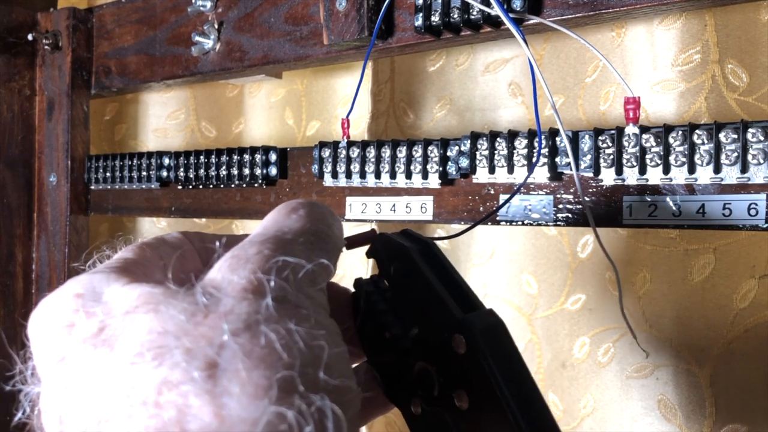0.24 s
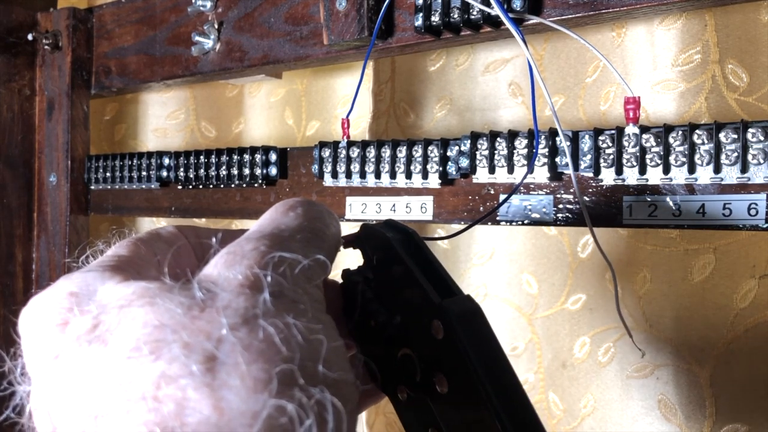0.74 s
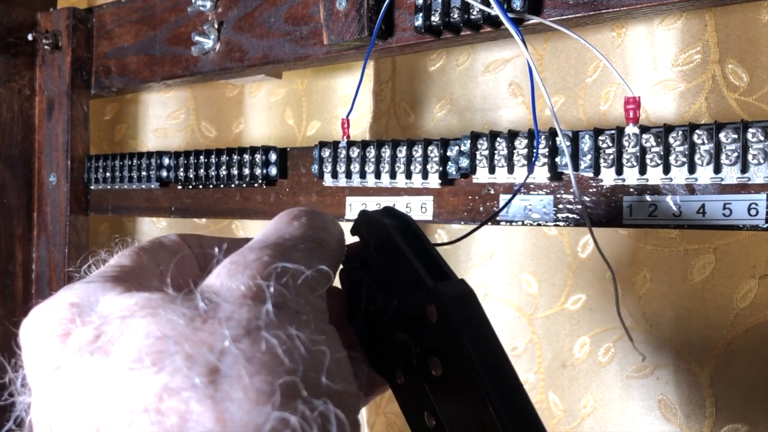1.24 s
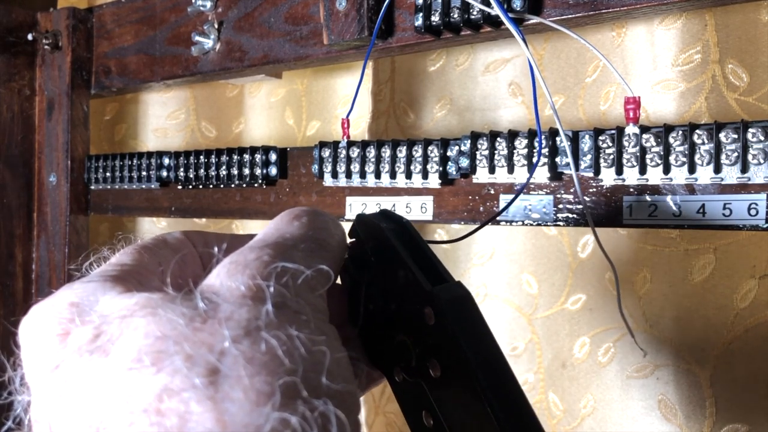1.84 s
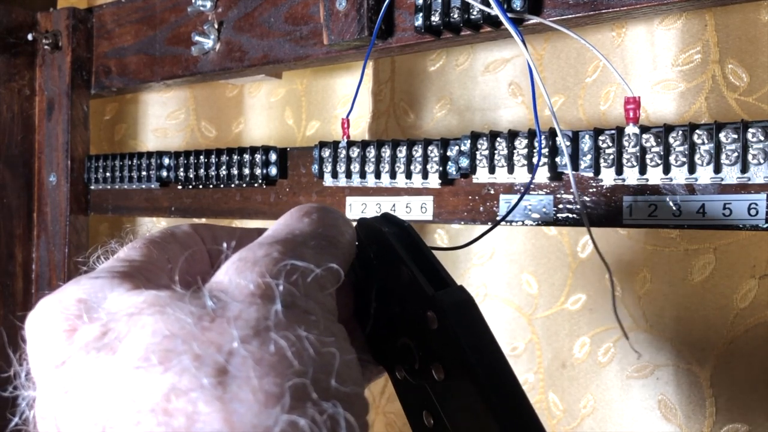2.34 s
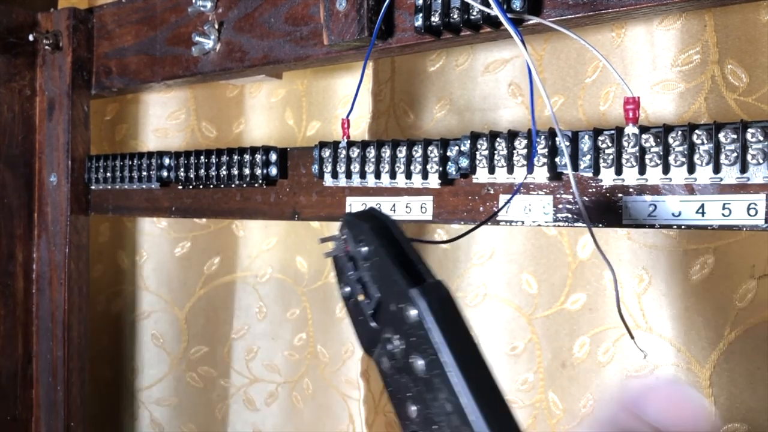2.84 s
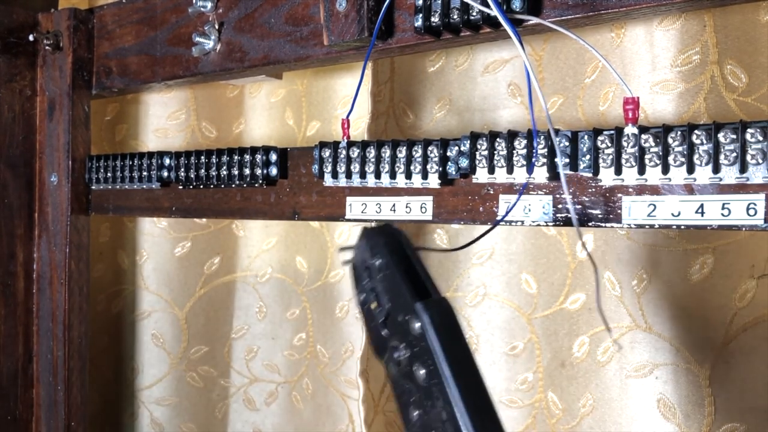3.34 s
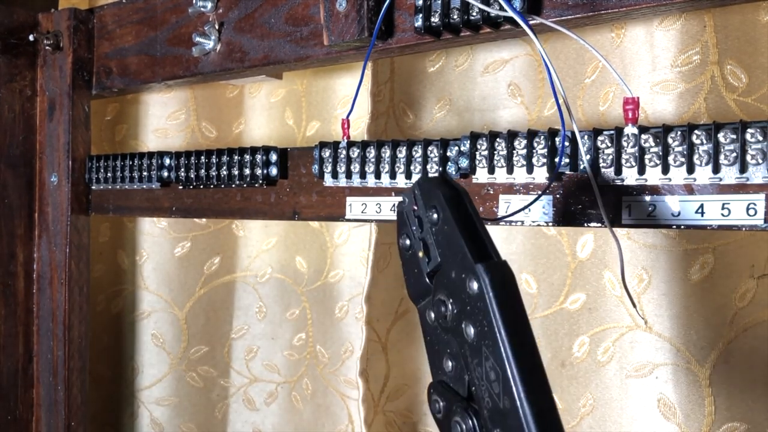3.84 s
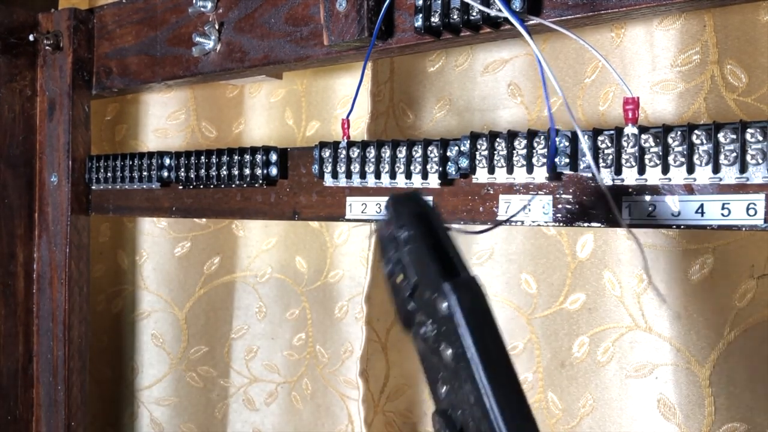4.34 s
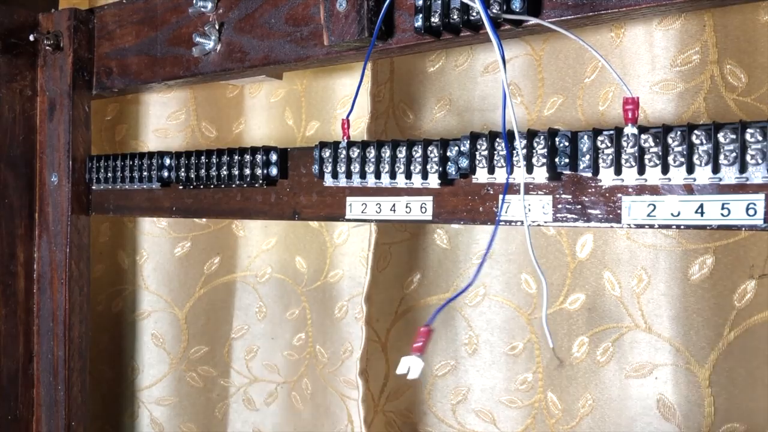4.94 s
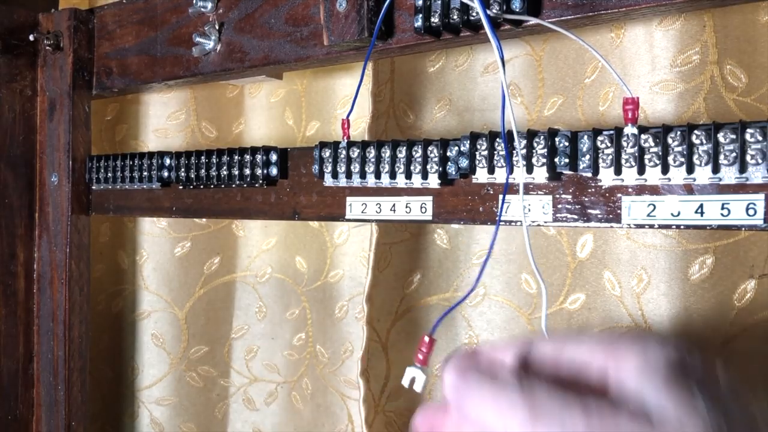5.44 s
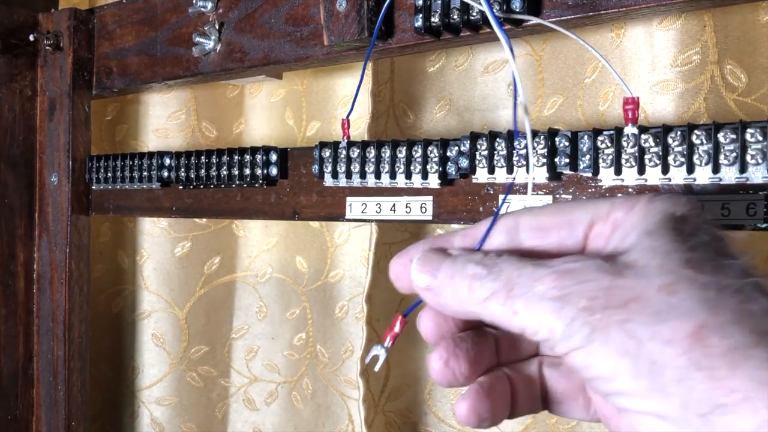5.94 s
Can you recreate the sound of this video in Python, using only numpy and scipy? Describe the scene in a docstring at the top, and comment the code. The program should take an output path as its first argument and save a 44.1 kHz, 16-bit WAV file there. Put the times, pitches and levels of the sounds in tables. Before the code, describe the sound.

A ratchet crimping tool clicks sharply shut, chatters open, then clatters onto a wooden bench, close up in a quiet room.

```python
"""Ratchet crimper at the bench

Close to the microphone in a quiet room, a crimping tool is squeezed shut on a wire terminal. Its pawl
snaps over tooth after tooth and chatters back on release, leaving loose steel parts ringing. The tool
is dropped and clatters on the wooden bench, which booms under it and creaks under a leaning arm.
Fingers tick and rub on the handles over the hum of the room; two faint chirps come from far off."""
import sys
import numpy as np
from scipy import signal
from scipy.io import wavfile
from scipy.ndimage import uniform_filter1d

SR = 44100
rng = np.random.default_rng(int(sys.argv[2]) if len(sys.argv) > 2 else 0)


def store_wav(level_fs):
    """Save 16-bit WAV to argv[1]."""
    pcm = np.round(np.clip(np.atleast_2d(level_fs), -1, 1) * 32767)
    wavfile.write(sys.argv[1], SR, pcm.T.astype(np.int16))


N = 273574

# spectrum of a blow on the tool's steel: (frequency [Hz], level [dB])
STEEL_SPECTRUM = [(150, -51.5), (300, -29), (800, -20), (1150, -21), (1320, -14), (1480, -6), (1800, -13),
                  (2150, -8.5), (2700, -7), (3600, -5.5), (4400, -5.5), (5800, -3.5), (9700, -4.5),
                  (12000, -7.5), (15300, -6.5), (16500, -18)]


def pawl_snaps():
    """Close up, the pawl drops over each tooth, rattling the steel and knocking the grips."""
    # (time [s], level [dB], bass [dB], treble [dB], two loudest bands [Hz], lower middle [dB], grips [dB])
    snaps = [(1.9865, -19.5, -22, -4.5, 4690, 5710, -1.5, -60.5),
             (2.0718, -18.5, -21.5, -2.5, 4900, 5710, -3, -56),
             (2.1323, -19, -19.5, -4, 4950, 6350, -4.5, -48.5),
             (2.6917, -19, -19, -1.5, 3720, 5810, 1, -49), (3.2967, -18.5, -12, -13, 4100, 7200, 0, -50.5),
             (3.4, -18, -25.5, -6.5, 3750, 7000, -1, -41), (3.4581, -18.5, -24, -3.5, 4150, 8980, 0.5, -43),
             (3.5543, -20, -29.5, -3, 4300, 5850, 0, -38), (3.6368, -19, -31.5, -6, 4400, 6010, -3, -38),
             (3.6934, -19, -26, -7, 4500, 6040, -3.5, -41.5),
             (3.7279, -16, -22.5, -3, 2830, 4830, -1.5, -33),
             (3.8541, -20, -33, -1.5, 4800, 5970, -10, -51), (3.8688, -24, -37, 1, 4660, 5870, -7, -52),
             (4.3629, -22, -21, 0, 4740, 6140, -1, -46),
             (4.3776, -20.5, -37.5, -4.5, 4750, 8280, -2, -65.5),
             (4.3933, -19.5, -23.5, 0, 5150, 7320, -5, -47), (4.4132, -19, -33, -2, 3650, 6900, -6.5, -60),
             (4.4385, -17.5, -29.5, -5.5, 3620, 7380, 0.5, -45.5),
             (4.4567, -18.5, -24, -2.5, 3600, 6100, -1, -46.5),
             (4.4665, -18, -27, -3.5, 3450, 6220, -5, -52), (4.5665, -23, -19, 1, 3260, 6480, -2.5, -50),
             (4.6046, -18.5, -19.5, -2, 3600, 5770, 4.5, -57),
             (4.617, -24.5, -18, -5.5, 2650, 5580, 3, -57)]
    # modes of the grips: (frequency [Hz], level [dB], t60 [s])
    grip_modes = [(516, -11.5, 0.045), (814, -4.5, 0.021), (1351, 3.5, 0.028), (1420, -8, 0.013)]
    out = np.zeros((N, 2))
    for start, db, bass_db, treble_db, *bands_hz, lower_mid_db, grips_db in snaps:
        colour = [(hz, steel_db + lower_mid_db * (2400 < hz < 4000)) for hz, steel_db in STEEL_SPECTRUM]
        snap = rattle(colour, bass_db, treble_db, bands_hz,
                      t60=0.026, hold_s=0.0012, late_db=-10, late_t60=0.07)
        add(out, start, gain_of(db) * snap)
        add(out, start, ring(grip_modes, grips_db, rise_s=0.0026))
    return out


def finger_taps():
    """Light touches on the tool set off small rattles."""
    # (time [s], level [dB], bass [dB], treble [dB], loudest band [Hz], t60 [s])
    taps = [(0.0217, -64.5, -19, -29, 3530, .04), (0.1316, -48.5, -11.5, -21, 2920, 0.022),
            (1.1464, -71, -18, 0, 6000, .04), (1.1785, -57, -1.5, -27, 3130, 0.053),
            (1.5309, -43.5, -22, -18, 6200, 0.098), (1.932, -47, -26, -39.5, 2600, 0.056),
            (1.938, -45, -21, -14, 8450, 0.13), (2.296, -64, -16, -2, 7760, .04),
            (2.498, -71, -20, -3, 8000, 0.032), (2.647, -68, -18, -22, 4200, .04),
            (2.5321, -55, -9.5, -7, 3460, 0.055), (2.8928, -56, -1, -19, 3300, .04),
            (3.028, -67.5, -16.5, -29, 3410, .047), (3.111, -76.5, -27, -11.5, 4710, 0.031),
            (3.1815, -73.5, -14, -34.5, 5560, .044), (3.2334, -43, -25.5, -14.5, 3280, 0.037),
            (3.276, -63.5, -19, -11, 6000, 0.025), (3.391, -59.5, -14, -23.5, 4000, 0.013),
            (3.835, -52, -18, -1, 5000, .02), (4.16, -58.5, -3, -31, 2400, 0.06),
            (4.18, -54.5, -11, -23, 4700, 0.024), (4.224, -45, -18, -12, 4320, .12),
            (4.2852, -62.5, -14, -8, 2780, 0.052), (4.3113, -48.5, -10.5, -14, 3240, 0.074),
            (4.336, -51, -18, -17.5, 3070, 0.23), (4.354, -49, -14, -8, 3300, .03),
            (4.7373, -55, -4, -22, 2600, .03), (4.746, -60, -22, -20, 4450, .06),
            (4.998, -63, -20, -6, 4000, .03), (5.0817, -59.5, -21, 0, 7200, 0.057),
            (5.156, -56, -25.5, -12, 4300, .025), (5.1676, -52, -16, -8.5, 4000, 0.089),
            (5.6717, -66.5, -18, -9, 7500, 0.028), (6.023, -45.5, -6, -23, 3000, 0.054)]
    out = np.zeros((N, 2))
    for start, db, bass_db, treble_db, *bands_hz, t60 in taps:
        tap = rattle(STEEL_SPECTRUM, bass_db, treble_db, bands_hz,
                     t60, hold_s=0.00099, late_db=-19, late_t60=0.069)
        add(out, start, gain_of(db) * tap)
    return out


def loose_parts():
    """Some contacts leave the tool's loose parts ringing, each in its own modes."""
    # modes of the parts: (frequency [Hz], level [dB], t60 [s])
    part_modes = [(2283, 0, .09), (2655, -8, .1), (3435, -8, .12), (4600, -8, .2), (5087, -1, .48),
                  (6040, -4, .42), (6390, 1, .45), (6870, -9, .3), (7260, -14, .4), (5540, 0, 1.05),
                  (7750, 0, .9), (8490, -6, .9), (9280, -7, .5), (11850, -6, .8), (2546, -3, .13),
                  (4140, 0, .075), (4936, -1, .065), (2660, -5, .2), (3070, -1, .2), (3280, 0, .2)]
    # the part each mode belongs to: (index, 0 = frame to 5 = link)
    part_of_mode = [0] * 3 + [1] * 6 + [2] + [3] * 4 + [4] * 3 + [5] * 3
    # (time [s], frame [dB], handles [dB], spring [dB], jaws [dB], pawl [dB], link [dB])
    contacts = [(1.531, -47, -62, -75, -95, -80, -80), (1.936, -62, -72, -80, -76, -45, -65),
                (2.133, -65, -80, -84, -69, -62, -60), (3.297, -60, -80, -85, -90, -55, -55),
                (3.400, -60, -80, -80, -90, -55, -58), (3.728, -60, -80, -80, -90, -55, -54),
                (4.312, -62, -64, -76, -95, -60, -55), (4.467, -58, -64, -59.5, -85, -55, -51),
                (4.605, -52, -75, -67, -90, -58, -49)]
    out = np.zeros((N, 2))
    for start, *part_db in contacts:
        add(out, start, ring(part_modes, np.array(part_db)[part_of_mode], rise_s=0.00069))
    return out


def drop_on_bench():
    """The tool lands and bounces; the wood rings and the board booms under it."""
    # (time [s], level [dB], bass [dB], treble [dB], two loudest bands [Hz], wood [dB], boom [dB])
    knocks = [(5.2574, -16.5, -10, -10, 2460, 4750, -25.5, -41.5),
              (5.3267, -27, 1.5, -6, 1660, 4000, -36, -40.5),
              (5.434, -24, 4.5, -8.5, 1790, 4230, -36.5, -40.5),
              (6.0349, -17.5, -3.5, -16, 1720, 4470, -29, -39.5),
              (6.0373, -15.5, -29, -7.5, 3370, 6300, -31, -48),
              (6.0449, -15, -7, -15, 3080, 4600, -44, -40.5), (6.0623, -17, 4, -13, 1280, 3600, -39, -31.5),
              (6.0735, -19, 4, -17, 1680, 3370, -28.5, -40), (6.0801, -21, -7, -15.5, 2290, 3700, -37, -54),
              (6.099, -20, 1.5, -25, 1770, 4300, -33, -47)]
    # spectrum of a blow on the bench: (frequency [Hz], level [dB])
    knock_spectrum = [(35, -49.5), (60, -1), (194, -11), (366, -4.5), (1690, -0.5), (2040, -2.5),
                      (2350, 3.5), (2770, 0), (3110, 3.5), (3580, -3.5), (4700, -1), (6450, -4),
                      (15000, -18), (16500, -20)]
    # upper and lowest modes of the bench: (frequency [Hz], level [dB], t60 [s])
    wood_modes = [(328.6, -4.5, 0.062), (228.3, -8.5, 0.085), (444, -7.5, 0.078), (512, -4.5, 0.1),
                  (581, -5.5, 0.12), (655, -8.5, 0.05), (727, -5.5, .08), (820, -6, 0.12),
                  (1007, -3.5, 0.08), (1086, -17.5, 0.26), (1262, -8, .08), (1730, -16, 0.17),
                  (1770, -19, 0.089)]
    boom_modes = [(85, -8, .2), (114, 0, .3), (150, -1, .35), (185, -5, .2), (260, -3, .12)]
    out = np.zeros((N, 2))
    for start, db, bass_db, treble_db, *bands_hz, wood_db, boom_db in knocks:
        clatter = rattle(knock_spectrum, bass_db, treble_db, bands_hz,
                         t60=0.035, hold_s=0.00046, late_db=-11.5, late_t60=0.17)
        add(out, start, gain_of(db) * clatter)
        scatter_db = 2.0 * rng.standard_normal(len(wood_modes))
        add(out, start, ring(wood_modes, wood_db + scatter_db, rise_s=0.0068))
        add(out, start, ring(boom_modes, boom_db, rise_s=0.0045))
    return out


def rattle(colour, bass_db, treble_db, bands_hz, t60, hold_s, late_db, late_t60):
    """A blow, then jostling parts, treble dying first. Columns: (to the microphone, into the room)."""
    t, hz = np.arange(4096) / SR, np.fft.rfftfreq(4096, 1 / SR)
    since_hold = np.maximum(t - hold_s, 0)
    noise = rng.standard_normal(len(t)) * np.minimum(t / 0.00063, 1)
    dull = signal.lfilter(*signal.butter(2, 6500, fs=SR), noise)
    jostle = dull * gain_of(-60 * since_hold / t60) + (noise - dull) * gain_of(-75 * since_hold / t60)
    crack = noise * gain_of(-4 - 60 * since_hold / 0.0033)  # the first contact
    late = noise * gain_of(late_db - 60 * t / late_t60)
    bands_db = sum(8 / (1 + ((hz - centre) / 260) ** 2) for centre in bands_hz)
    db = curve_at(colour, hz) + bands_db
    # shelves set bass and treble against the middle of the range
    middle_db = band_db(db, hz, 2500, 8000)
    bass_shelf = (bass_db + middle_db - band_db(db, hz, 1000, 2200)) / (1 + (hz / 2100) ** 8)
    treble_shelf = (treble_db + middle_db - band_db(db, hz, 9000, 15500)) / (1 + (8500 / (hz + 1)) ** 8)
    body_db = db + bass_shelf + treble_shelf
    direct = signal.oaconvolve(crack + jostle + late, minimum_phase(body_db))
    # averaged over all directions, the loudest bands stand out less
    spread = minimum_phase(body_db - 0.45 * bands_db)
    spread = np.pad(spread, (0, len(direct) - len(spread))) * np.linalg.norm(direct) / np.linalg.norm(spread)
    loudest_rms = np.sqrt(uniform_filter1d(direct ** 2, size=88).max())  # over 2 ms
    return np.transpose([direct, spread]) / loudest_rms


def ring(modes, weight_db, rise_s):
    """Struck modes die away as sines of random phase, summed into one column."""
    hz, db, t60 = np.transpose(modes)
    t = np.arange(0, min(0.75, 1.2 * t60.max()), 1 / SR)[:, None]
    sines = np.sin(2 * np.pi * (hz * t + rng.random(len(hz))))
    decays = gain_of(db + weight_db - 60 * t / t60)
    return (decays * sines).sum(axis=1, keepdims=True) * np.minimum(t / rise_s, 1)


def finger_rub():
    """Skin slips over handles and wire in small grains of uneven size."""
    # (time [s], length [s], level [dB])
    strokes = [(1.42, 0.11, -78), (2.3, 0.088, -80), (2.47, .15, -80), (2.62, 0.067, -74),
               (2.83, 0.14, -75.5), (2.98, .08, -76.5), (3.08, 0.072, -72), (3.14, 0.11, -70.5),
               (3.95, .14, -73), (4.09, 0.064, -76), (4.68, 0.14, -69.5), (4.82, 0.086, -67.5),
               (4.93, 0.22, -65.5), (5.13, 0.23, -63), (5.5, 0.23, -75), (5.7, 0.097, -69),
               (5.81, .1, -68.5), (5.94, 0.36, -59.5)]
    # spectrum of sliding skin: (frequency [Hz], level [dB])
    skin_spectrum = [(880, -41), (1500, -1), (1800, -8.5), (3000, -3), (3900, -3.5), (4700, -6.5),
                     (5940, -12), (13000, -18), (16000, -14)]
    grains = gain_of(2.2 * np.repeat(rng.exponential(1, N // 64 + 1), 64)[:N])
    slips = shaped_noise(skin_spectrum, size=256, patchy_db=2.5) * uniform_filter1d(grains, size=64)
    return swells(strokes) * unit_rms(slips)


def bench_creak():
    """An arm leans on the bench: swells of low noise around its deepest modes."""
    # (time [s], length [s], level [dB])
    creaks = [(4.64, 0.064, -58.5), (4.72, 0.28, -59), (5.83, 0.15, -61)]
    # (frequency [Hz], level [dB])
    spectrum = [(90, -17.0), (150, 1.5), (210, -17), (400, -13.5), (900, -35.5), (3000, -60)]
    return swells(creaks) * shaped_noise(spectrum, size=1024, patchy_db=5.0)


def room_echoes(sound):
    """The walls return sparse echoes, each band dying at its own speed; three sets take turns."""
    # reverberation time: (frequency [Hz], t60 [s])
    decay_times = [(100, 0.73), (500, 0.38), (2000, 0.47), (6000, 0.32), (14000, 0.23)]
    # echoes against the direct sound: (frequency [Hz], level [dB])
    echo_levels = [(200, -6), (1500, -16.5), (5000, -19), (10000, -22), (15000, -24.5)]
    out = np.zeros(N)
    turn = 2 * np.pi * 7 * np.arange(N) / SR
    impulse = signal.stft(signal.unit_impulse(1024, 512), SR, nperseg=256)[2]
    for k in range(3):
        echoes = np.zeros(SR // 2)
        slots = np.arange(180, len(echoes) - 6, 6)
        echoes[slots + rng.integers(0, 6, len(slots))] = rng.choice([-1., 1.], len(slots))
        hz, t, bands = signal.stft(echoes, SR, nperseg=256)
        bands = bands * gain_of(-60 * t / curve_at(decay_times, hz)[:, None])
        bands = bands / np.linalg.norm(bands, axis=1)[:, None] * gain_of(curve_at(echo_levels, hz))[:, None]
        tail = signal.istft(bands * np.linalg.norm(impulse[9]), SR, nperseg=256)[1]
        crossfade = np.sqrt(2 / 3) * np.cos(turn + k * np.pi / 3)
        out += signal.fftconvolve(sound * crossfade, tail)[:N]
    return out


def room_hum():
    """Room tone: soft noise and a low drone that wavers in pitch and strength."""
    # spectrum of the room tone: (frequency [Hz], level [dB])
    spectrum = [(25, -35.5), (50, -3), (75, -21), (92, -9.5), (107, -5.5), (125, -5.5), (160, -11.5),
                (230, -15), (320, -17.5), (345, -10), (375, -15.5), (830, -15.5), (1100, -19), (2150, -29),
                (5100, -37.5), (9000, -48), (13000, -46.5), (15350, -42.5), (16500, -52.5)]
    level_drift, pitch_drift = [unit_rms(uniform_filter1d(uniform_filter1d(noise, size=2400), size=2400))
                                for noise in rng.standard_normal((2, N))]
    drone_hz = 106.3 + 3.3 * pitch_drift
    drone = np.sqrt(2) * gain_of(-69.5 + level_drift) * np.sin(2 * np.pi * np.cumsum(drone_hz) / SR)
    return gain_of(-63) * shaped_noise(spectrum, size=2048, patchy_db=1.7) + drone


def far_chirps():
    """Far from the microphone, a thin, slightly rough whistle twice slides up and levels off."""
    # (time [s], length [s], level [dB])
    chirps = [(0.284, .11, -82), (0.803, 0.108, -83)]
    from_hz, to_hz = 5400, 5650
    out = np.zeros(N)
    for start, length, db in chirps:
        progress = np.arange(0, length, 1 / SR) / length
        glide_hz = to_hz + (from_hz - to_hz) * np.exp(-4 * progress)
        jitter_hz = 40 * unit_rms(uniform_filter1d(rng.standard_normal(len(progress)), size=200))
        whistle = np.sin(2 * np.pi * np.cumsum(glide_hz + jitter_hz) / SR)
        add(out, start, gain_of(db) * np.sqrt(np.sin(np.pi * progress)) * whistle)
    return out


def swells(strokes):
    """Envelope in which each stroke swells and fades in one arch."""
    gain = np.zeros(N)
    for start, length, db in strokes:
        add(gain, start, gain_of(db) * np.sin(np.pi * np.arange(0, length, 1 / SR) / length) ** 0.8)
    return gain


def shaped_noise(spectrum, size, patchy_db):
    """Noise of a given spectrum with drifting louder and softer patches."""
    frames, hz = N // (size // 4) + 5, np.fft.rfftfreq(size, 1 / SR)
    real, imag, patches = rng.standard_normal((frames, len(hz), 3)).T
    patches = unit_rms(uniform_filter1d(uniform_filter1d(patches, size=10, axis=0), size=10, axis=1))
    bands = (real + 1j * imag) * gain_of(curve_at(spectrum, hz)[:, None] + patchy_db * patches)
    return unit_rms(signal.istft(bands, nperseg=size, noverlap=size - size // 4)[1][:N])


def minimum_phase(db):
    """Impulse response of least delay for a gain given in dB from 0 Hz to half the rate."""
    log_gain = np.log(gain_of(np.maximum(np.r_[db, db[-2:0:-1]], -100)))
    return np.fft.ifft(np.exp(np.conj(signal.hilbert(log_gain)))).real[:1024]


def band_db(db, hz, low_hz, high_hz):
    return 10 * np.log10(np.sum(gain_of(db[(hz > low_hz) & (hz < high_hz)]) ** 2))


def curve_at(points, hz):
    point_hz, values = np.transpose(points)
    return np.interp(np.log(hz + 1), np.log(point_hz + 1), values)


def gain_of(db):
    return 10 ** (np.asarray(db) / 20)


def unit_rms(x):
    return x / np.sqrt(np.mean(x ** 2) + 1e-20)


def add(mix, start_s, sound):
    part = mix[round(start_s * SR):][:len(sound)]
    part += sound[:len(part)]


def scene():
    """Tool and bench up close with their echoes, over the quiet background, in mono."""
    direct, spread = (pawl_snaps() + finger_taps() + loose_parts() + drop_on_bench()).T
    return (direct + room_echoes(spread) + finger_rub() + bench_creak() + far_chirps() + room_hum())[None]


def record(dry):
    """The microphone drops the deepest bass and rounds the loudest peaks; the top falls away near 16 kHz."""
    edge_hz = 17100
    low_cut = signal.sosfilt(signal.butter(3, 55, "high", fs=SR, output="sos"), dry)
    rounded = 0.59 * np.tanh(low_cut / 0.51)
    roll_off = signal.firwin2(511, [0, 15750, 15950, edge_hz, SR / 2], gain_of([0, 0, -13, -48, -48]), fs=SR)
    band_limit = signal.firwin(511, edge_hz, window=("kaiser", 9), fs=SR)
    return signal.oaconvolve(rounded, np.convolve(roll_off, band_limit)[None], "same")


dry = scene()
out = record(dry)
store_wav(out)
```